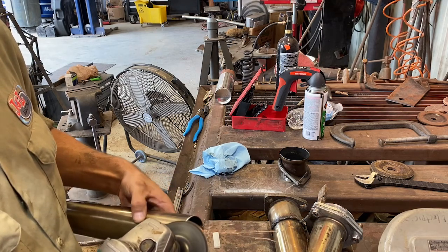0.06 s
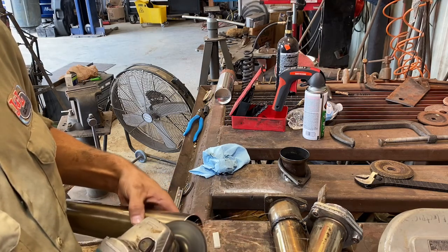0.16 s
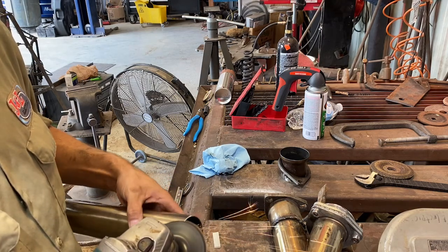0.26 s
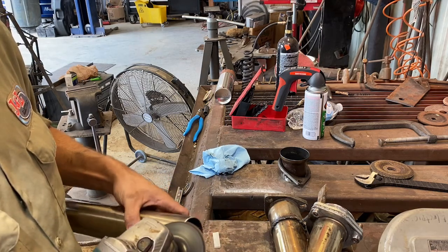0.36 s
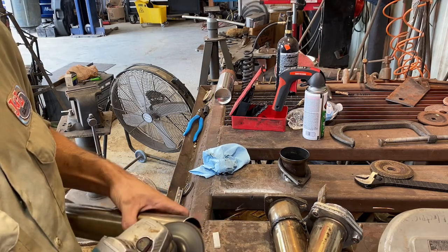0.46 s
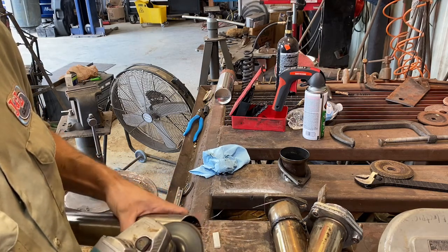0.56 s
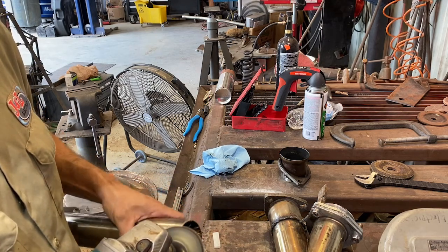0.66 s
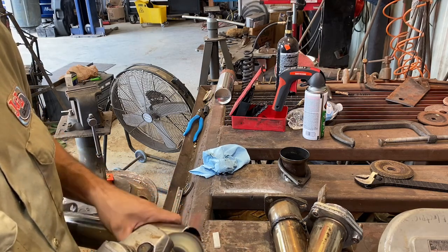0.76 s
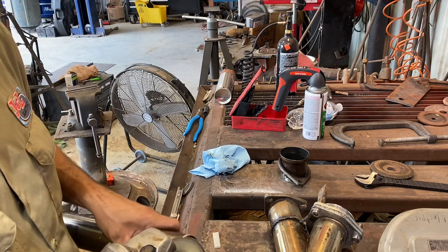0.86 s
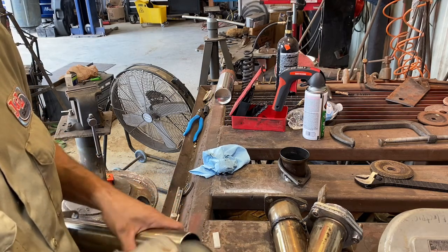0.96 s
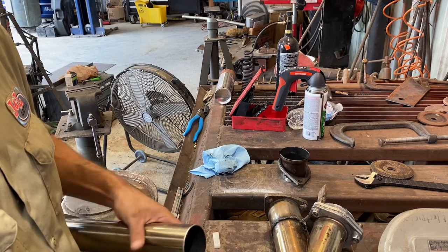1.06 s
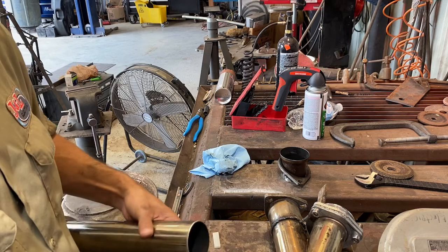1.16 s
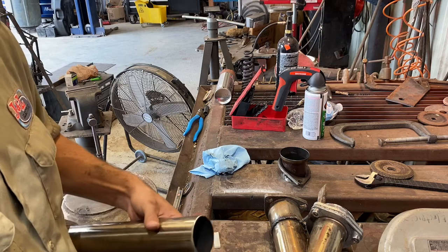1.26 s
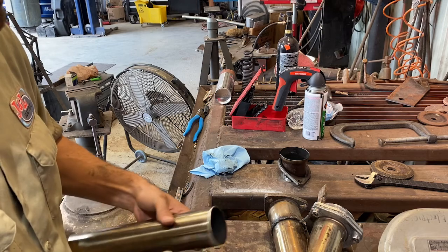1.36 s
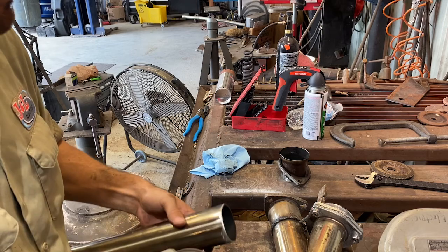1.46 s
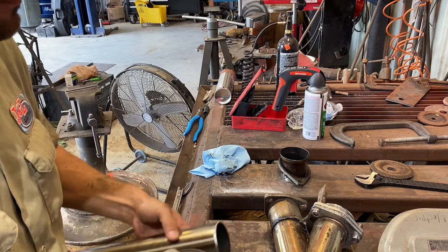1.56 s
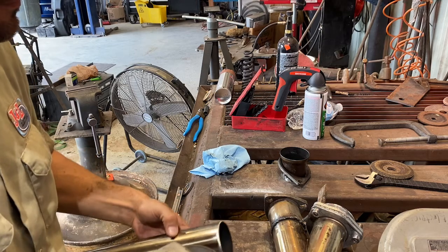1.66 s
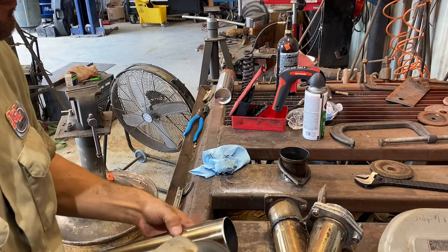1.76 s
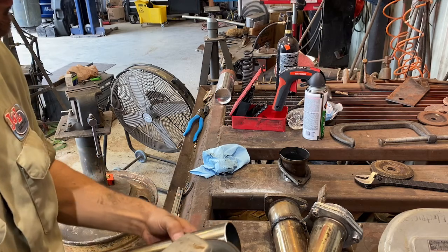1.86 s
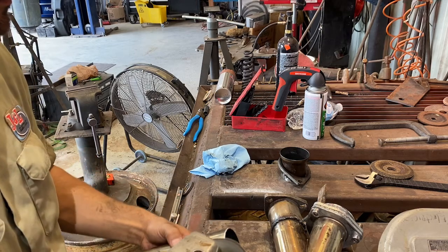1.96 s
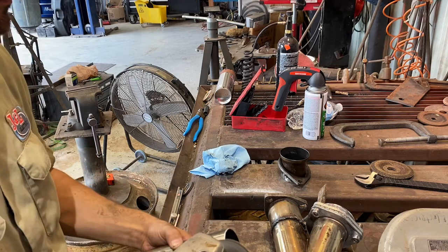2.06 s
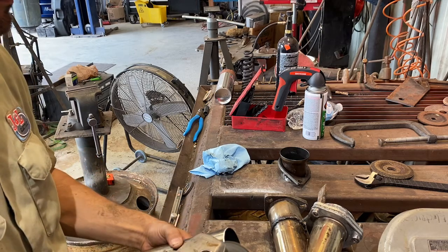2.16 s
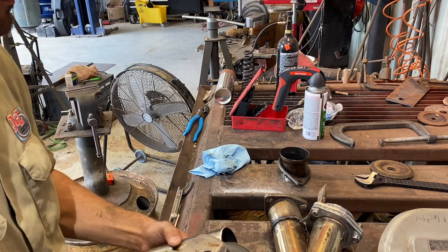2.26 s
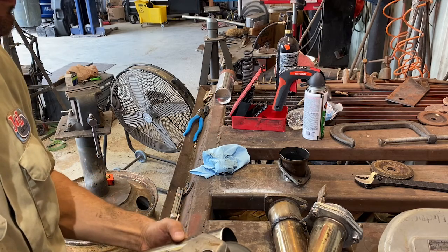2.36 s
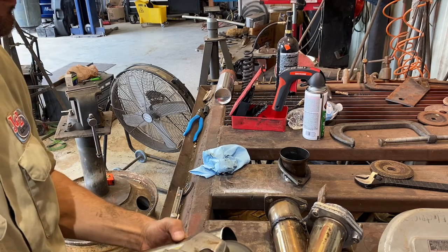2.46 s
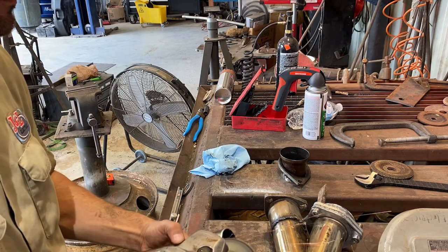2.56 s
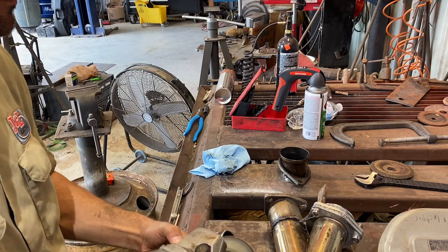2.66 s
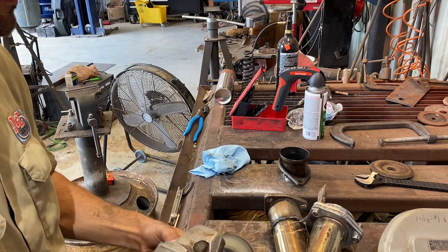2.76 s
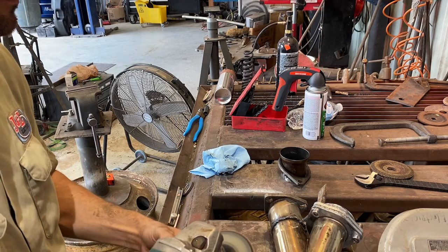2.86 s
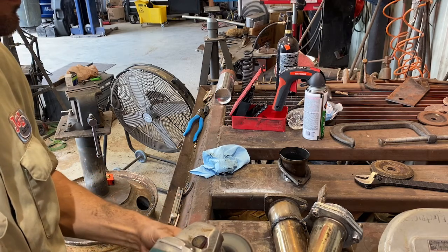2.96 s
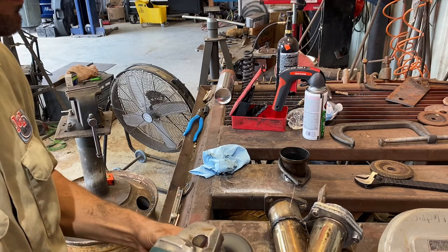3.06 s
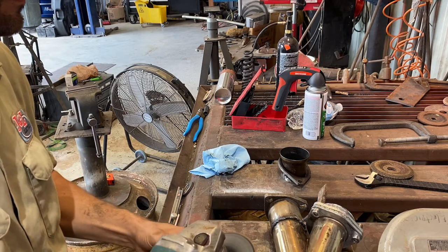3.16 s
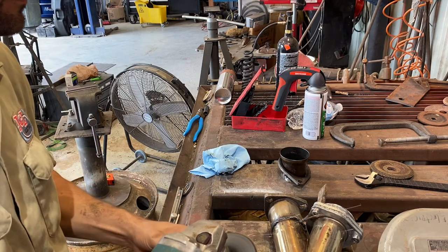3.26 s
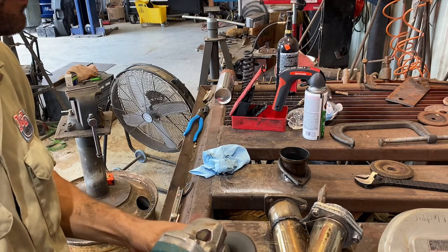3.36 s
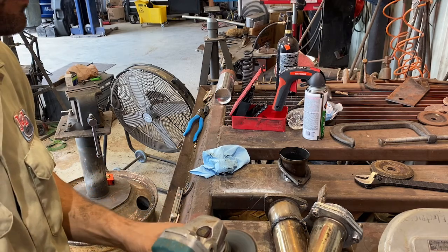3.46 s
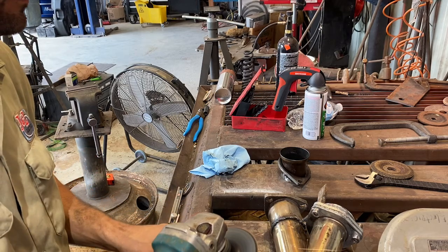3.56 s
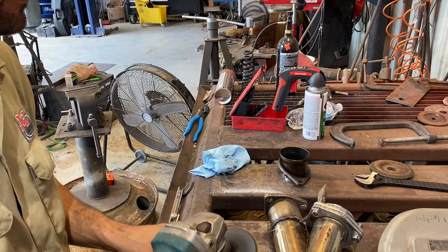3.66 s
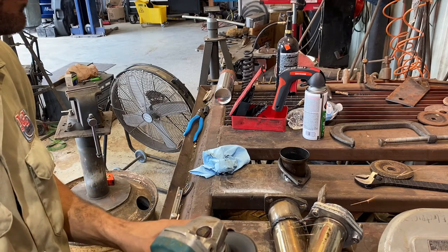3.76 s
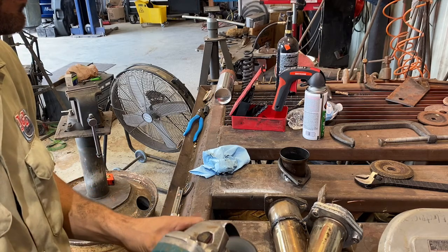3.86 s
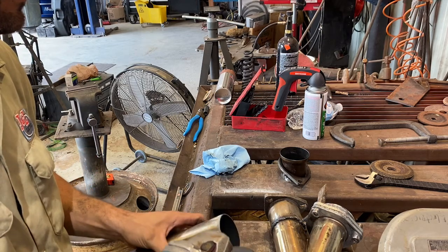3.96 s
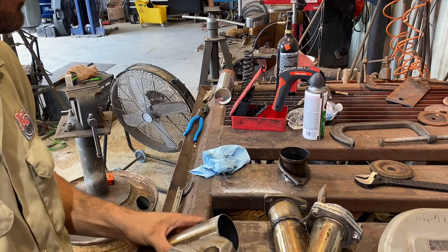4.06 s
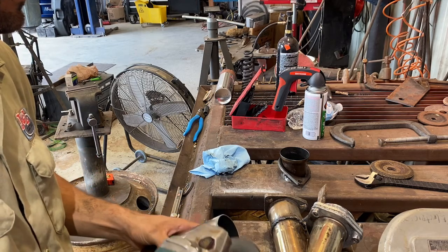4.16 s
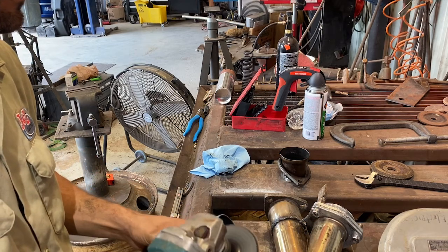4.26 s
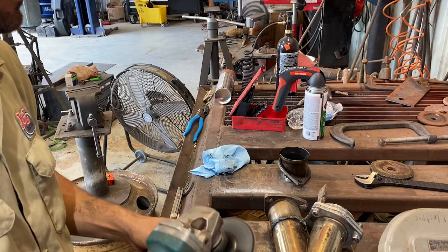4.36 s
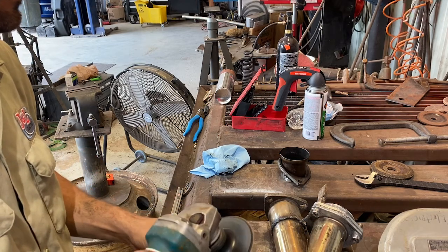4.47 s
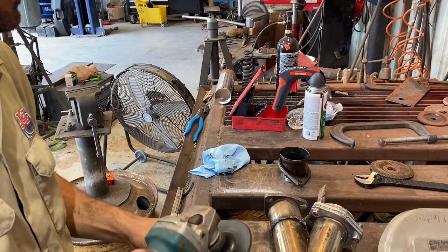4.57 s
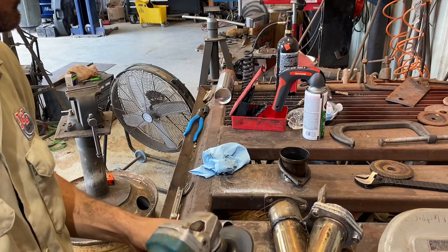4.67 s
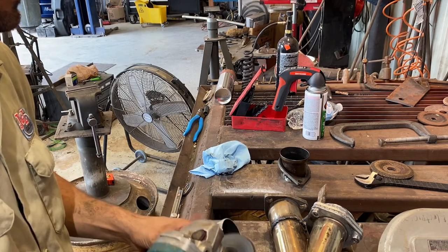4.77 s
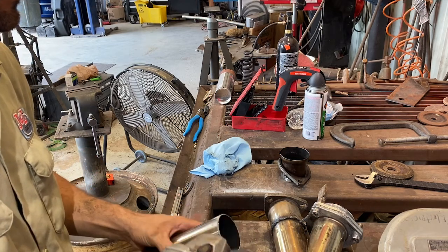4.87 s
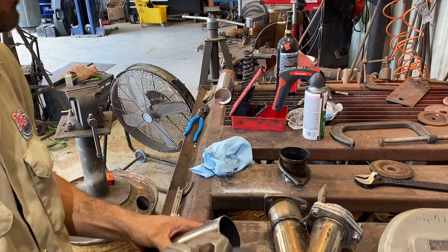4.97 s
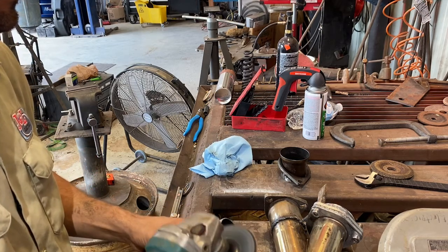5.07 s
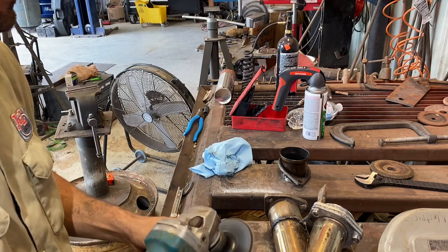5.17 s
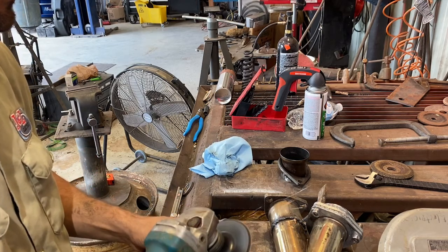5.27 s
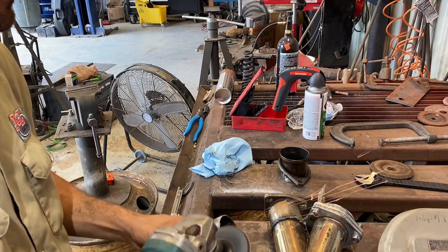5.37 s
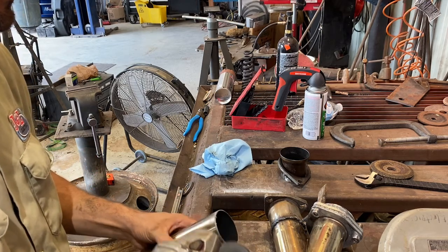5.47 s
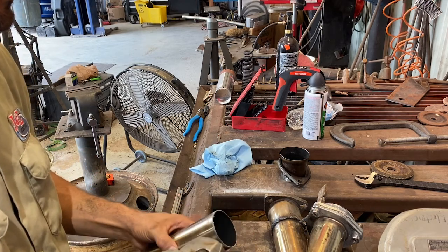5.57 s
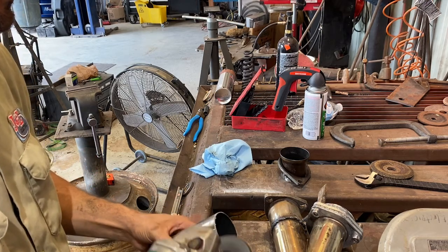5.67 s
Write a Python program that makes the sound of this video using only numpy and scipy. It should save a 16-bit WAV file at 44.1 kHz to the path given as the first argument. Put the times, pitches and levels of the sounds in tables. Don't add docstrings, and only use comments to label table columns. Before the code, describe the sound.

A close stereo microphone in a workshop hears an angle grinder already cutting into a steel pipe. From 0 to about 0.85 s a loud, bright, gritty hiss with ringing metallic bands and a rough buzz near 150 turns a second eases away, its tone changing around 0.5 s. Until 2.25 s only the motor remains: broad fan roar, airy slot hiss, light gear rattle, faint whine and low air puffs. The longest pass starts with a scrape at 2.25 s, swells from 2.45 to 2.9 s, changes colour as the grip shifts, chatters in rapid hops at 3.52-3.68 s and lifts off by 3.95 s. Motor roar continues, with a dull low knock at 4.18 s. A brief touch rasps at 4.59-4.8 s; a short, unsteady, fluttering grind follows at 5.18-5.45 s. The motor then runs free to the end, without spinning down. Reverberation is short and slight.

```python
import sys
import numpy as np
from scipy import signal
from scipy.fft import rfft, irfft, next_fast_len
from scipy.io import wavfile
from scipy.ndimage import uniform_filter1d, map_coordinates

SR = 44100
rng = np.random.default_rng(int(sys.argv[2]) if len(sys.argv) > 2 else 0)


def amp(db):
    return 10 ** (np.asarray(db, float) / 20)


def write(x):
    x = np.atleast_2d(x).T
    wavfile.write(sys.argv[1], SR, np.round(np.clip(x, -1, 1) * 32767).astype(np.int16))


N = 252252
T = np.arange(N) / SR

FREE_HZ, START_HZ, SETTLE_S = 155.29, 150.8, .65
DRAG_HZ = [11.1, 6.1, 2.0, 7.3, 7.15, 7.6, 7.2, 8.0]
# [t/s, level/dB]
STROKES = [
    [(0, -22.5), (.1, -23), (.3, -25.5), (.5, -26.5), (.54, -28.5), (.6, -29.5), (.8, -32)],
    [(2.255, -35), (2.43, -31), (2.48, -26.5), (2.62, -28), (2.69, -25), (2.82, -24), (2.9, -27.5),
     (3.5, -29), (3.84, -30)],
    [(4.59, -30), (4.645, -31), (4.71, -27.5), (4.75, -30)],
    [(5.183, -29), (5.21, -37), (5.235, -25), (5.265, -27), (5.295, -24.5), (5.33, -27), (5.36, -24)],
]
LIFT_S, LIFT_DB, AWAY_DB = .07, -28.5, -82
# [from t/s, to t/s, pipe-body level/dB, grit level/dB]
GRIPS = [(0, 0.531, -8.5, -2), (0.532, 0.903, -4, 2.5), (2.25, 2.598, -5, -5), (2.6, 2.929, -4, -0.5),
         (2.928, 3.498, -5.5, 0), (3.502, 3.959, -5, 1), (4.586, 4.86, -6, 0), (5.176, 5.48, -5.5, -0.5)]
# [f/Hz, level/dB per Hz]
GRIND_SPECTRUM = [(200, -52), (500, -28), (1000, -28.5), (1600, -26), (2300, -9), (3000, -14), (4200, -9.5),
                  (5500, -4), (6800, -5), (8500, -1), (10500, 0.5), (12500, -0.5), (14500, -2.5),
                  (16000, -10)]
# [f/Hz, level/dB]
PIPE_MODES = [
    [(2080, 0), (2240, -5), (3290, 5), (3580, -3), (5330, -6), (5940, 5), (6430, -18), (6980, -15)],
    [(2070, -3), (3240, 2), (5150, -7), (5300, -3), (5880, -4), (6190, -10), (6780, -2)],
    [(2310, -6), (2470, 1.5), (6170, -10), (6850, 5.5), (10700, 6.5), (13600, 9)],
    [(2300, -3), (5180, -4), (5350, -8), (5810, -6), (6400, 3), (6550, -1), (6860, -3)],
    [(2270, -5.5), (2560, -0.5), (3610, 3), (4530, -15), (4980, -9), (5580, 1.5), (6480, 4.5), (7190, 6.5),
     (13600, 0)],
    [(2380, -1), (4920, -9), (5370, -6), (5980, -1), (6410, -1), (6830, -1), (7470, -4)],
    [(2440, 0.5), (3670, -3), (4260, -1), (4430, -1), (5190, 3.5), (5800, 0), (6560, 0), (7180, -6)],
    [(2290, -11), (2440, -2), (5200, 4), (5800, -12), (6570, -1), (6870, -9), (7300, -4)],
]
PIPE_WIDTH_HZ = 110
# [f/Hz, width f/Hz, level/dB]
DISC_MODES = [(6800, 200, -3), (10100, 200, -1), (10800, 150, -3), (11500, 200, 0), (13600, 130, 1)]
# [multiple of disc speed, level/dB under the pressure]
SHUDDER = [
    [(2, -44), (3, -33), (4, -28), (5, -37), (6, -31), (7, -47), (8, -24.5), (10, -30)],
    [(3, -29), (4, -26.5), (7, -33), (12, -20)],
    [(4, -18), (5, -20), (11, -16.5)],
    [(2, -42), (4, -29), (5, -28), (9, -28)],
    [(2, -41), (4, -46), (7, -30)],
    [(4, -25), (5, -23)],
    [(4, -24), (5, -4)],
    [(4, -19), (5, -6)],
]
SHUDDER_BUILD_S = .07
BODY_FOLLOWS, GRIT_EARLY_S = 0.51, 0.006
# [t/s, blow level/dB]
LANDINGS = [(2.2533, -9.5), (4.5921, -11.5), (5.184, -11.5), (5.221, -14.5)]
# (from t/s, to t/s, lifted level/dB)
BOUNCING = (3.522, 3.682, -13)
HOP_S = .01345
HOP_DB, HOP_FADE_DB, HOP_BODY_DB = -8.5, -0.5, -4
# [t/s, fan roar level/dB, slot hiss level/dB]
MOTOR_AIM = [(0, -43, -56), (.6, -47, -45), (.9, -46, -43), (1.34, -45.5, -39), (1.42, -42.5, -35.5),
             (2.2, -42, -47), (2.76, -40.5, -31), (2.84, -45, -48), (3.7, -45.5, -39), (4.38, -46, -68),
             (4.46, -43, -67), (5.72, -43, -59)]
# [f/Hz, level/dB per Hz]
ROAR_SPECTRUM = [(100, -15.5), (250, -18.5), (400, -10), (700, -5), (1200, -1.5), (1700, -3.5),
                 (2500, -1.5), (3600, -3), (4600, -5), (5500, -3.5), (6300, -5), (8500, -4), (11800, -7.5),
                 (16500, -9.5)]
# [f/Hz, width f/Hz, level/dB]
HOUSING_MODES = [(1275, 220, -6), (4250, 210, -7.5), (7020, 250, -8.5), (2810, 87, -25.5)]
# [f/Hz, width f/Hz, level/dB]
VENT_MODES = [(11770, 1100, 2), (10000, 820, -7)]
VENT_DB = 1.1
RATTLE_DB, RATTLE_FOLLOWS = -47, .3
# (f/Hz, level/dB)
HUM = (240, -69.5)
GEAR_RATIO = 3.7
# [multiple of armature speed, level/dB]
ARMATURE = [(1, -57), (2, -60), (3, -64), (12, -59)]
# [multiple of disc speed, level/dB]
SPINDLE = [(1, -69.5), (2, -73), (3, -63.5)]
# [t/s, level/dB]
BUFFET = [(0, -63), (.9, -73), (1.45, -63.5), (3.1, -62), (3.6, -69), (5.72, -70)]
# [t/s, level/dB]
GUSTS = [(1.5, -66), (2.1, -61), (2.47, -52), (2.71, -70), (2.9, -48.5), (3.15, -62), (4.3, -64),
         (5.3, -64)]
GUST_S, LUMPS_DB = .04, 1.5
# [t/s, level/dB, f/Hz, width f/Hz]
KNOCKS = [
    (2.785, -53, 285, 120),
    (4.183, -46, 266, 197.3),
]
ROOM_T60_S = .35
# [f/Hz, coherence 0..1]
COHERENCE = [(50, .9), (300, .64), (600, .62), (1500, .67), (3300, .66), (5200, .4), (6500, .78),
             (7500, .95), (14000, .975), (15300, 1)]
# [f/Hz, level/dB]
LEFT_DB = [(50, -.2), (200, 0), (1000, 4), (2100, .5), (4000, 4.5), (5500, 5.5), (6500, 2), (8500, .1),
           (16000, .1)]
# [f/Hz, phase/rad]
LEAD = [(0, 0), (2500, 1.2), (4400, .6), (5600, 1.5), (6900, 0), (9000, -3.14), (13300, -9.42),
        (15300, -12.57), (22050, -12.57)]
EDGE_HZ = 15950


def evened(x):
    return x / np.sqrt(np.mean(abs(x) ** 2) + 1e-20)


def read(points, hz):
    f, value = np.transpose(points)
    return np.interp(np.log(hz + 1), np.log(f + 1), value)


def columns(rows):
    s, *values = np.transpose(rows)
    return [np.interp(T, s, v) for v in values]


def between(start, end):
    return 1. * (T >= start) * (T < end)


def filtered(x, gain):
    size = next_fast_len(x.shape[-1] + 4096, True)
    spectrum = rfft(x, size) * gain(np.fft.rfftfreq(size, 1 / SR))
    return irfft(spectrum, size)[..., :x.shape[-1]]


def ringing(modes, hz):
    return sum(amp(db) / (1 + 2j * (hz - f) / max(width, 110)) for f, width, db in modes)


def patchy(x, patchy_db, wide, long):
    z = signal.stft(x, nperseg=256)[2]
    patches = uniform_filter1d(rng.standard_normal(z.shape), int(wide), 0)
    patches = uniform_filter1d(patches, int(long), 1)
    return signal.istft(z * amp(patchy_db * evened(patches)), nperseg=256)[1][:N]


def wander(hz):
    coarse = signal.lfilter([1], [1, -np.exp(-2 * np.pi * hz / 100)], rng.standard_normal(700))
    return np.interp(T, np.arange(600) / 100, evened(coarse[100:]))


def disc_turns():
    touching = sum(between(stroke[0][0], stroke[-1][0] + LIFT_S / 2) for stroke in STROKES)
    drag = touching * sum(hz * between(*grip[:2]) for grip, hz in zip(GRIPS, DRAG_HZ))
    r = np.exp(-1 / (SETTLE_S * SR))
    sag = signal.lfilter([1 - r], [1, -r], drag)
    speed = FREE_HZ - sag - (FREE_HZ - START_HZ) * np.exp(-T / SETTLE_S)
    return np.cumsum(speed) / SR


def pressure():
    rows = []
    for stroke in STROKES:
        (touch, _), (end, db) = stroke[0], stroke[-1]
        rows += [(touch - .004, AWAY_DB), *stroke]
        rows += [(end + LIFT_S, db + LIFT_DB), (end + 2 * LIFT_S, AWAY_DB)]
    return columns(rows)[0]


def disc_face(turns, wear_turns, hiss, high_spot):
    a, b = rng.standard_normal((2, 900, 110))
    fade = np.exp(-1 / wear_turns)
    orders = signal.lfilter([1], [1, -fade], a + 1j * b, axis=0)
    orders = signal.lfilter([1], [1, -fade], orders, axis=0)
    orders /= abs(orders) ** .85
    face = irfft(np.pad(orders, ((0, 0), (1, 0))), 2048)
    grit = map_coordinates(face, [turns + 20, turns % 1 * 2048], order=1, mode="grid-wrap")
    wobble = np.exp(high_spot * np.cos(2 * np.pi * turns + 1.9 * wander(5.7)))
    return evened(wobble * (evened(grit) + hiss * rng.standard_normal(N)))


def grinding(turns):
    face = disc_face(turns, wear_turns=22, hiss=.2, high_spot=.22)
    strikes, out = blows(), np.zeros(N)
    lifted = uniform_filter1d(between(*BOUNCING[:2]), size=300)
    face *= amp(1.36 * wander(9.2) + BOUNCING[2] * lifted)
    hand_db = pressure()
    ahead_db = np.interp(T + GRIT_EARLY_S, T, hand_db)
    body_lag_db = (BODY_FOLLOWS - 1) * np.maximum(hand_db + 28.5, -18) + HOP_BODY_DB * lifted
    r = np.exp(-1 / (SHUDDER_BUILD_S * SR))
    built = signal.lfilter([1 - r], [1, -r], amp(hand_db), zi=[amp(hand_db[0])])[0]
    shake = np.minimum(amp(hand_db), built ** 3 / amp(2 * hand_db))
    shake *= amp(BOUNCING[2] * lifted)
    force = amp(hand_db) * face + strikes
    for (start, end, body_db, grit_db), modes, shudder in zip(GRIPS, PIPE_MODES, SHUDDER):
        held = slice(max(round(start * SR) - 200, 0), round(end * SR) + 200)
        fade = uniform_filter1d(between(start, end), size=300)[held]
        pipe = [(f, PIPE_WIDTH_HZ, db) for f, db in modes]

        def colour(hz):
            modal = 1 + 1.59 * ringing(pipe, hz) + 1.2 * ringing(DISC_MODES, hz)
            return amp(read(GRIND_SPECTRUM, hz)) * modal

        ring = filtered(force[held], colour)
        body = filtered(ring, lambda hz: 1 / (1 + (hz / 4000) ** 8))
        grit = filtered(ring, lambda hz: 1 - 1 / (1 + (hz / 8500) ** 12))
        middle = ring - body - grit
        sparks_db = grit_db + np.minimum(ahead_db - hand_db, 0)[held]
        body_gain = amp(body_db + body_lag_db[held] + 10.5)
        out[held] += fade * amp(6.0) * (middle + body * body_gain + grit * amp(sparks_db))
        for order, db in shudder:
            level = np.sqrt(2) * shake[held] * amp(db + 2.5 * wander(3)[held])
            out[held] += fade * level * np.sin(2 * np.pi * order * turns[held])
    return patchy(out, patchy_db=2.86, wide=2.5, long=50.5)


def motor(turns):
    roar_db, slot_db = columns(MOTOR_AIM)
    shell = lambda hz: amp(read(ROAR_SPECTRUM, hz)) * (1 + ringing(HOUSING_MODES, hz))
    roar = evened(filtered(rng.standard_normal(N), shell))
    roar = patchy(roar, patchy_db=0.64, wide=4.5, long=16.0)
    vent = filtered(roar, lambda hz: 1 - 1 / (1 + (hz / 1600) ** 4))
    once_a_turn = 1 + 0.022 * np.cos(2 * np.pi * turns)
    out = amp(roar_db + 10.5) * (roar - vent + vent * amp(VENT_DB)) * once_a_turn
    out += amp(slot_db) * evened(filtered(rng.standard_normal(N), lambda hz: ringing(VENT_MODES, hz)))
    taps = np.diff(np.floor(turns), prepend=0) * rng.uniform(-1, 1, N) ** 3
    teeth = filtered(taps, lambda hz: ringing([(5550, 1000, 0), (4350, 500, -8)], hz) ** 2)
    rattle_db = RATTLE_DB + 2 * (roar_db + 44) + RATTLE_FOLLOWS * (slot_db + 52)
    return out + amp(rattle_db) * evened(teeth)


def hum():
    hz, db = HUM
    return np.sqrt(2) * amp(db + 2.0 * wander(1.7)) * np.sin(2 * np.pi * hz * T)


def whine(turns):
    near_db, out = .6 * (columns(MOTOR_AIM)[0] + 45), np.zeros(N)
    for ratio, orders in ((GEAR_RATIO, ARMATURE), (1, SPINDLE)):
        for order, db in orders:
            phase = 2 * np.pi * order * ratio * turns + .3 * wander(4)
            out += np.sqrt(2) * amp(db + near_db + 1.5 * wander(4)) * np.sin(phase)
    return out


def buffet():
    a, b, c = rng.standard_normal((3, N))
    ports = np.array([a + 0.28 * b, a + 0.23 * c])
    air = filtered(ports, lambda hz: (hz / 60) ** 4 / (1 + (hz / 62) ** 6.5))
    gusts = sum(amp(db) * np.exp(-.5 * ((T - s) / GUST_S) ** 2) for s, db in GUSTS)
    return (amp(columns(BUFFET)[0] + LUMPS_DB * wander(8)) + gusts) * evened(air)


def blows():
    out, t = np.zeros(N), np.arange(3000) / SR
    hops = np.arange(BOUNCING[0] + .0034, BOUNCING[1], HOP_S)
    tiring = ((hops - hops[0]) / (hops[-1] - hops[0])) ** 3
    for s, db in list(LANDINGS) + list(zip(hops, HOP_DB + HOP_FADE_DB * tiring)):
        slide_s = .005 if BOUNCING[0] < s < BOUNCING[1] else .011
        scrape = (1 - np.exp(-t / .0012)) * np.exp(-t / slide_s)
        out[round(s * SR):][:len(t)] += amp(db - 9.5) * scrape
    return out * rng.standard_normal(N)


def knocks():
    out, t = np.zeros(N), np.arange(8000) / SR
    for s, db, hz, width in KNOCKS:
        thud = evened(filtered(rng.standard_normal(len(t)), lambda f: ringing([(hz, width, 0)], f)))
        envelope = (1 - np.exp(-t / 0.0023)) * np.exp(-t / 0.047)
        out[round(s * SR):][:len(t)] += amp(db) * thud * envelope
    return out


def workshop(x, t60):
    at = np.arange(100, 20000, 20) + rng.integers(0, 20, (2, 995))
    taps = np.zeros((2, 20050))
    np.put_along_axis(taps, at, rng.choice([-1., 1.], at.shape) * amp(-60 * at / SR / t60), 1)
    tail = signal.oaconvolve(x[None], taps / np.linalg.norm(taps[0]), axes=1)[:, :N]
    same = lambda hz: np.clip(read(COHERENCE, hz), 0, 1)
    direct = filtered(x, lambda hz: np.sqrt(same(hz)))
    return direct + filtered(tail, lambda hz: np.sqrt(1 - same(hz)))


def scene():
    turns = disc_turns()
    sources = grinding(turns) + motor(turns) + hum() + knocks()
    return workshop(sources, t60=ROOM_T60_S) + whine(turns) + buffet()


def roll_off(x):
    return signal.sosfilt(signal.butter(12, 16960, fs=SR, output="sos"), x)


def record(dry):
    lead_hz, lead = np.transpose(LEAD)
    half = lambda hz: amp(read(LEFT_DB, hz) / 2) * np.exp(.5j * np.interp(hz, lead_hz, lead))
    edge = lambda hz: np.clip((EDGE_HZ - hz) / 150, 0, 1)
    ports = filtered(dry, lambda hz: np.array([half(hz), 1 / half(hz)]) * edge(hz))
    return roll_off(ports)


dry = scene()
out = record(dry)
write(out)
```